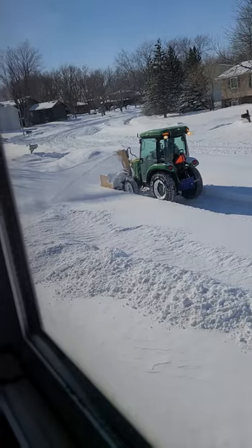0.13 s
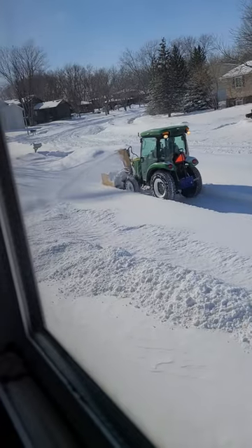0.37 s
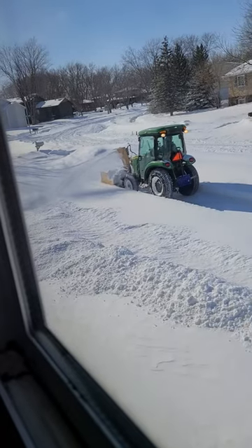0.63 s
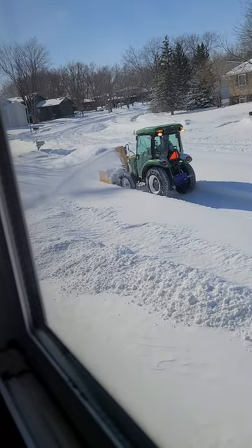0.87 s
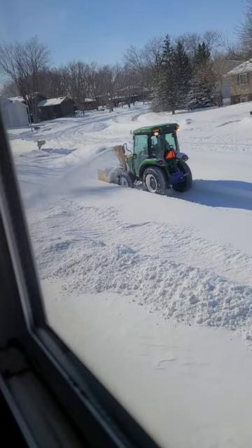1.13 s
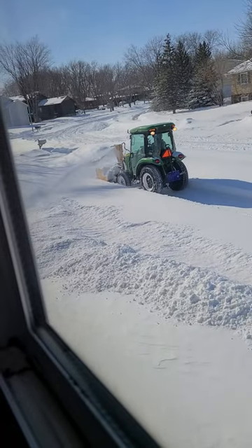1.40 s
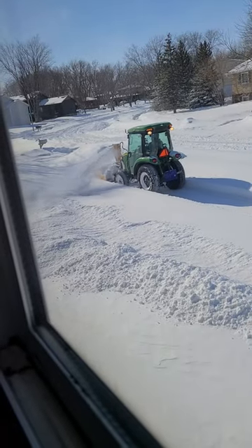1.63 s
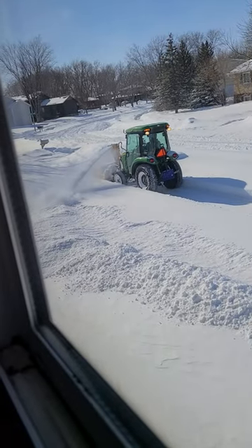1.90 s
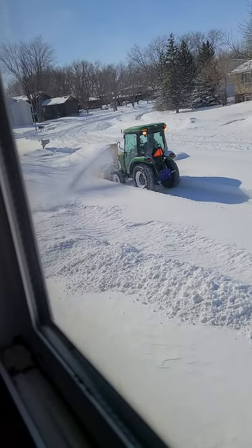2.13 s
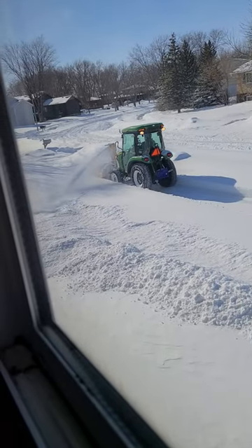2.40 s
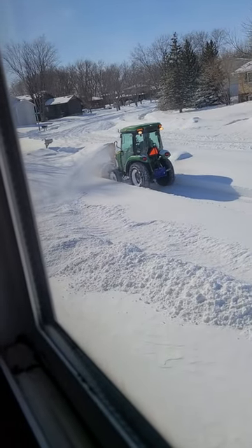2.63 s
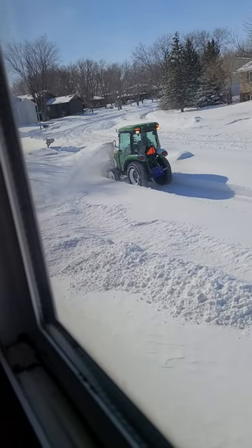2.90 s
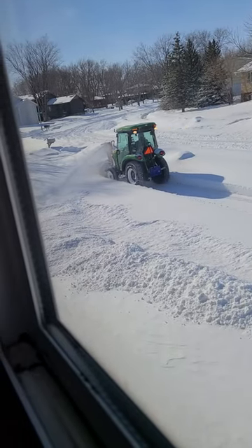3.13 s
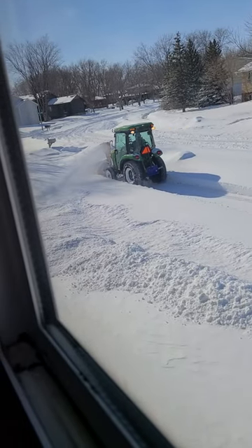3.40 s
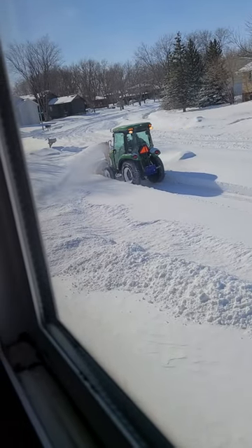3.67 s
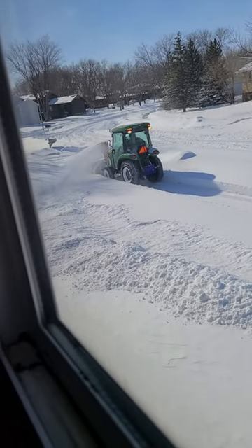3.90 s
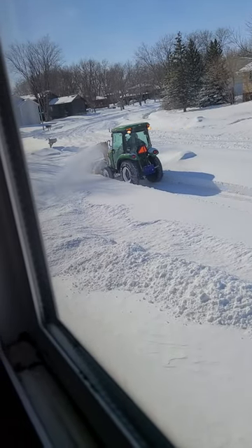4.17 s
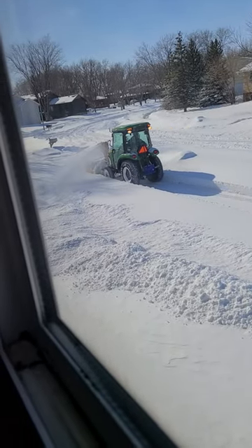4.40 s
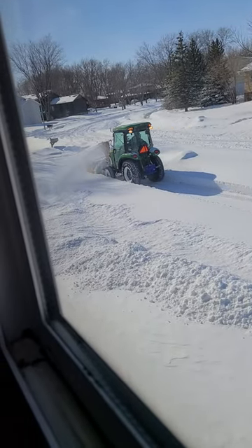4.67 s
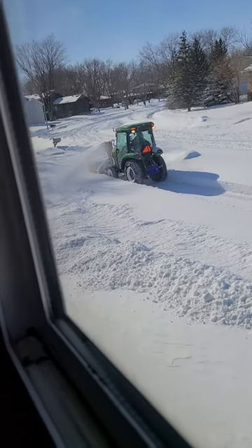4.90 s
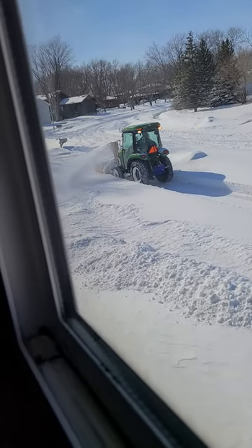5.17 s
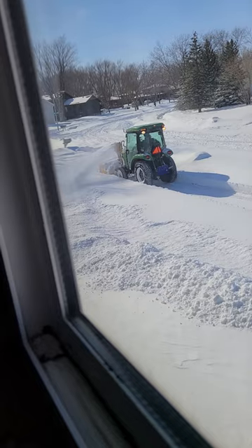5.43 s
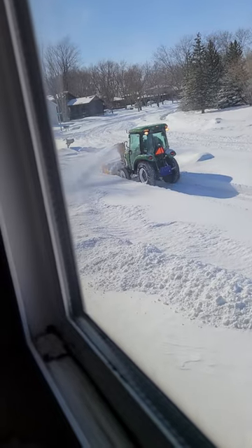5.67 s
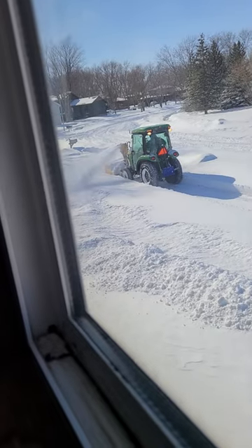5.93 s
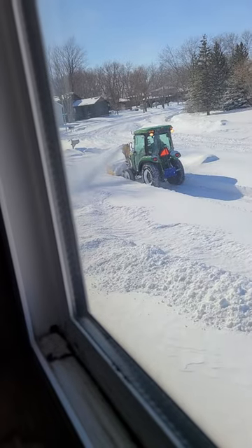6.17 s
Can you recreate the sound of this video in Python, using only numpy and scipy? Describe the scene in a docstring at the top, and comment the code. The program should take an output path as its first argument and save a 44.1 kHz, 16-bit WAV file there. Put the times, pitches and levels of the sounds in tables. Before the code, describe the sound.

Heard from indoors through glass, a tractor's deep steady engine hum and blower rattle rise in pitch as the load drops away.

```python
"""In a room with the window closed, a small diesel tractor is heard blowing snow in a yard and driving off.
The exhaust beat is a stack of waves locked to the firing; it booms and speeds up as the load drops.
The three-blade blower hums as waves locked to its shaft, and rattles with a pattern repeated every turn.
Shaped noise makes the rumble, clatter and roar, ringing at fixed pitches of pane and room.
Thin whines, a few late swells of hum, two faint close ticks and a quiet hiss complete the scene."""
import sys
import numpy as np
from scipy import signal
from scipy.fft import rfft, irfft
from scipy.io import wavfile

SR = 44100
rng = np.random.default_rng(int(sys.argv[2]) if len(sys.argv) > 2 else 0)


def int16_out(signal):
    """Quantize to a 16-bit WAV file."""
    q = np.round(np.clip(np.atleast_2d(signal).T, -1, 1) * 32767)
    wavfile.write(sys.argv[1], SR, q.astype(np.int16))


def ratio(d):
    """dB to gain"""
    e = np.asarray(d, float) / 20
    return 10 ** e


N = 277830
T = np.arange(N) / SR  # time of every sample, seconds
HZ = np.fft.rfftfreq(N, 1 / SR)

# How noise differs between left and right.
# Each row: frequency in Hz, left minus right in dB.
SIDE_BALANCE = [(60, 0), (170, -3.5), (290, 5), (450, -3.5), (850, 1), (2440, -1), (4150, 4), (6500, 9.5),
                (8500, 8.5), (10000, 0)]
# Each row: frequency in Hz, likeness of the two sides from 0 to 1.
SIDE_LIKENESS = [(40, 0.99), (100, .95), (180, .95), (300, 0.7), (480, .7), (600, 0), (1000, 0.1),
                 (2500, 0.18), (4000, 0.4), (6000, 0.01), (12000, 0.2)]
# Each row: frequency in Hz, radians by which left leads.
LEFT_LEAD = [(0, 0.24), (950, 1), (1460, 4.5), (1810, 0.77), (2330, 9), (2840, 7.95), (3790, 14),
             (4480, 14.65), (5340, 15), (5940, 19), (6460, 11), (7240, 18.5)]

# How the tractor moves.
# Engine speed. Each row: time in seconds, firing rate in Hz.
FIRING_RATE = [(0.0, 42.76), (0.39, 42.75), (0.72, 42.48), (1.18, 42.72), (1.38, 42.58), (1.58, 42.29),
               (1.97, 42.73), (2.36, 42.72), (2.95, 43.07), (3.15, 42.94), (3.54, 43.92), (3.74, 45.12),
               (4.33, 48.41), (4.53, 48.05), (4.72, 48.6), (4.92, 48.4), (5.51, 48.95), (6.3, 48.92)]
# The tractor swings round. Each row: time in seconds, share of the turn from 0 to 1.
SWING_ROUND = [(0, 0.01), (.7, 0.17), (1.36, 0.36), (1.5, 0.6), (2.4, 0.79), (3.5, 1.0)]
UNLOAD_S, UNLOAD_LENGTH_S = 3.92, .09  # the blower leaves the drift, then the tractor draws away

# How the level of each part follows the drive.
# Each row: dB at first, dB change over the swing, dB change on unloading, dB per second after.
ORDER_LEVELS = [(-41.5, -2, 1, -11.5), (-38.5, -2.7, 0.35, -5), (-43, -14.5, 0, -5.5), (-61.5, 5, -9, -3.5),
                (-54.5, -8.0, -3.5, -2.5), (-52.0, -6, -6.5, -0.8), (-60.5, -3, -9, 2)]  # one row for each exhaust order, 1 to 7
HUM_LEVEL = (-51.0, -2, -4, -0.4)
WHINE_LEVEL = (-57.5, -1, -9.5, -4.5)
RUMBLE_LEVEL = (-61.5, -0.5, 1.4, -4)
CLATTER_LEVEL = (-68, -3.0, -2.5, -0.63)
ROAR_LEVEL = (-60.5, -1, 2.5, -0.42)

# Higher exhaust orders. Each row: order, dB against order 7.
HIGH_ORDERS = [(8, -10), (9, -5), (10, -13), (11, -13)]
# Unequal cylinders fill in quarter orders. Each row: order, dB against order 2.
UNEVEN_ORDERS = [(.75, -34), (1.25, -29), (1.75, -21), (2.25, -29), (4.75, -36), (5.75, -34), (8.75, -39)]
# Room booms. Each row: frequency in Hz, width in Hz, lift in dB.
ROOM_BOOMS = [(46.15, 3.4, 5.5), (86.1, 7.2, 5.5), (182.2, 11, 9.5), (231, 9.0, 4), (267.2, 10, 6)]
SURGE_FIRINGS = 15.76  # the exhaust sags once in so many firings, as the auger bites
# Sag as a share: depth for a full swing, depth added once unloaded; then its place in the cycle in turns.
SURGE_DEPTH, SURGE_DEEPENS, SURGE_TURNS = 0.13, 0.094, 0.06
SHADE_S, SHADE_DB = 5.58, -5  # the exhaust drops suddenly as the pipe turns away

IMPELLER_TURNS = .4609  # blower shaft turns per firing
PUMP_CYCLES = 6.273  # cycles per firing of a geared whine
RATTLE_SHARE = .16  # rms of the repeating rattle against the noise
# Blower tones. Each row: multiple of the shaft rate, dB against the blade hum.
BLADE_TONES = [(3, 0), (7, -14), (9, -18)]

# Noise colours. Each row: frequency in Hz, relative level in dB per Hz.
RUMBLE_SHAPE = [(20, -25.5), (32, -8), (45, 1), (65, 1.5), (100, -0.5), (150, -6), (220, -9.5), (300, -12),
                (450, -28.5), (600, -48.5), (1200, -96.5)]
CLATTER_SHAPE = [(400, -38), (700, -16), (1300, 1.5), (1600, -10.5), (1900, -2.5), (2250, -4), (2800, -3.5),
                 (4700, -14.5), (7000, -22), (8200, -41), (9200, -78.5)]
ROAR_SHAPE = [(25, -30.5), (60, -8), (150, -16), (270, -7.5), (450, -17), (560, -29.5), (850, -31.5),
              (1100, -30.5), (1600, -32), (2800, -35.5), (4500, -37), (6500, -47), (8000, -61.5),
              (9000, -84)]
HISS_SHAPE = [(6000, -20), (8300, -3), (9300, -8), (9900, -4), (10700, -5), (11800, 0), (13300, 1),
              (15600, -1)]
# Whines of the tractor let through by the pane.
# Each row: frequency in Hz, width in Hz, dB over the clatter, left minus right in dB.
PANE_WHINES = [(1260, 30, 5, 0), (1780, 60, 5, -3), (1840, 40, 4, -3), (1895, 30, 5, -3), (1950, 40, 5, -2),
               (2126, 20, 11, 1), (2358, 30, 5, 0)]
# Pitches at which pane and room ring.
# Each row: frequency in Hz, width in Hz, dB over the roar, left minus right in dB.
PANE_RINGS = [(300.4, 2.6, 5.5, 3.5), (353, 10, 10, -0.5), (385.3, 10, 10.5, -10.5),
              (451.8, 31.8, 6.5, -1.5), (528, 6.2, 0.5, -3.5), (626.6, 69, 7.5, -4.5), (702.5, 32, 17, 5),
              (749, 11, 13.5, 5.5), (1002, 37, 12.5, 1), (1178, 120, 4.5, 0), (2763, 220, 6.5, 6),
              (3096, 140, 7.5, 5.5), (3290, 110, 7, -3)]

# A thin high whistle that fades as the tractor turns away. Each row: time in seconds, level in dB.
WHISTLE_LEVEL = [(0, -78.5), (.6, -78), (1, -83.5), (2.2, -85), (4, -91.5), (6.3, -99)]
# A transmission whine glides with ground speed. Each row: time in seconds, pitch in Hz, level in dB.
GLIDE_PATH = [(0, 1840, -82), (.7, 1815, -83), (1.3, 1825, -86), (1.6, 1862, -81), (2.3, 1890, -81),
              (3.2, 1905, -81), (3.7, 1900, -84), (4.1, 1850, -88), (5.0, 1870, -86), (6.3, 1880, -95)]
HISS_DB = -86.5
# Close ticks. Each row: start in seconds, starting level in dB, seconds to fall 60 dB, left minus right in dB.
TICK_EVENTS = [(0.2374, -65.5, 0.045, 8), (1.332, -65.5, 0.096, 6)]
# Band of each tick. Each row: lowest Hz, highest Hz.
TICK_BANDS = [(6300, 8300), (4800, 6800)]
# Swells of a hum that emerges as the exhaust fades. Each row: start in seconds, length in seconds, level in dB.
HUM_SWELLS = [(4.401, 0.37, -56.5), (5.048, 0.33, -58), (5.45, .5, -55.5), (6.024, 0.32, -54)]


def read(points, hz):
    """Reads a table on a log-frequency axis."""
    f, value = np.transpose(points)
    return np.interp(np.log(hz + 1), np.log(f + 1), value)


def curve(rows, index):
    """Reads one column of a time table at every sample."""
    columns = np.transpose(rows)
    return np.interp(T, columns[0], columns[index])


def drift(rate_hz):
    """Random wandering of rms about 1: slow waves, from 0.3 Hz up to rate_hz, that start at random points."""
    hz = np.geomspace(.3, rate_hz, num=20)
    waves = np.sin(2 * np.pi * (np.outer(T[::200], hz) + rng.random(len(hz))))
    coarse = waves @ hz ** -.5  # slower waves are stronger
    return np.interp(T, T[::200], coarse / coarse.std())


def sided(db):
    """Gains for left and right from a left-right difference in dB."""
    return ratio(np.multiply.outer([.5, -.5], db))


def noise(shape, peaks=(), pattern=0., band=(0, 22050)):
    """Two-sided noise of rms 1 within band: a smooth spectrum with resonant bumps, partly alike on both sides."""
    a, b, c, d = rng.standard_normal((len(HZ), 4)).T
    same = np.clip(read(SIDE_LIKENESS, HZ), 0, 1)
    steady = rfft(pattern * np.ones(N)) / np.sqrt(N / 2)  # a repeating part is shared by both sides
    left = a + 1j * b
    right = same * left + np.sqrt(1 - same ** 2) * (c + 1j * d) + steady
    right = right * np.exp(-1j * np.interp(HZ, *np.transpose(LEFT_LEAD)))
    power = np.ones((2, len(HZ)))
    for hz, width, db, side_db in peaks:
        bump = 1 / (1 + (2 * (HZ - hz) / width) ** 2) ** 2
        power += (ratio(db) * sided(side_db))[:, None] ** 2 * bump
    z = np.array([left + steady, right]) * np.sqrt(power)
    z = z * ratio(read(shape, HZ)) * sided(read(SIDE_BALANCE, HZ))
    in_band = (HZ > band[0]) * (HZ < band[1])
    return irfft(z, N) / irfft(z * in_band, N).std()


def unloaded():
    """Share 0-1 of the load that has dropped."""
    return np.clip((T - UNLOAD_S) / UNLOAD_LENGTH_S, 0, 1)


def heard(first_db, swing_db, unload_db, away_db):
    """Level in dB of one part as the tractor swings round, unloads and draws away."""
    turned_db = first_db + swing_db * curve(SWING_ROUND, index=1)
    return turned_db + unload_db * unloaded() + away_db * np.maximum(T - UNLOAD_S, 0)


def room_lift(hz):
    """Lift in dB where a tone comes near one of the room booms."""
    return sum(db / (1 + (2 * (hz - f) / width) ** 2) for f, width, db in ROOM_BOOMS)


def exhaust(turn):
    """Orders locked to the firing; pipe and pane delay each differently, and the room lifts orders 1-7."""
    firing = curve(FIRING_RATE, index=1)
    depth = SURGE_DEPTH * curve(SWING_ROUND, index=1) ** .5 + SURGE_DEEPENS * unloaded()
    depth = np.clip(depth, 0, .9)
    sag_db = 20 * np.log10(1 - depth * np.cos(turn / SURGE_FIRINGS - 2 * np.pi * SURGE_TURNS))
    sag_db = sag_db + SHADE_DB * np.clip((T - SHADE_S) / 0.052, 0, 1)
    orders = [(k, heard(*row) + room_lift(k * firing) + sag_db) for k, row in enumerate(ORDER_LEVELS, start=1)]
    second_db, seventh_db = orders[1][1], orders[6][1]
    # these follow order 7 or order 2, lift included
    orders += [(k, seventh_db + db) for k, db in HIGH_ORDERS]
    orders += [(k, second_db + db) for k, db in UNEVEN_ORDERS]
    beat = np.zeros(N)
    for k, db in orders:
        lag = 1.2 * (k - 2) ** 2  # radians
        wobble_db = (0.26 + .14 * k) * drift(15)  # higher orders waver more
        beat += ratio(db + wobble_db) * np.cos(k * turn + lag)
    return beat


def blower_hum(shaft):
    """Blade tones at multiples of the shaft rate, each wavering in level."""
    return sum(ratio(heard(*HUM_LEVEL) + db + drift(13)) * np.cos(k * shaft) for k, db in BLADE_TONES)


def geared_whine(turn):
    """One wavering tone geared to the engine."""
    return ratio(heard(*WHINE_LEVEL) + drift(52)) * np.cos(PUMP_CYCLES * turn)


def rumble():
    """Low noise that follows the drive."""
    return ratio(heard(*RUMBLE_LEVEL)) * noise(RUMBLE_SHAPE, band=(105, 120))


def knocks(shaft, blade_db, fall_db):
    """The rattle of one blower turn, repeated every turn; every third harmonic is stronger."""
    k = np.arange(20, 130)
    lines = np.zeros(2049, complex)
    lines_db = blade_db * (k % 3 == 0) - fall_db * np.log2(k / 20)
    lines[k] = ratio(lines_db) * np.exp(2j * np.pi * rng.random(len(k)))
    place = np.arange(4096) / 4096  # share of one turn
    one_turn = irfft(lines) * (1 + .35 * np.cos(3 * 2 * np.pi * place))  # swells as each blade passes
    return np.interp(shaft / (2 * np.pi), place, one_turn / one_turn.std(), period=1)


def clatter(shaft, rattle):
    """Bright noise with whines and rattle, throbbing at one, three and five times the shaft rate."""
    throb_db = .8 * np.cos(shaft) + .6 * np.cos(3 * shaft) + .4 * np.cos(5 * shaft)
    level_db = heard(*CLATTER_LEVEL) + throb_db + 0.26 * drift(14.0)
    return ratio(level_db) * noise(CLATTER_SHAPE, PANE_WHINES, rattle, band=(1700, 2200))


def roar(rattle):
    """Broad noise that rings at fixed pitches of pane and room and carries some rattle."""
    level_db = heard(*ROAR_LEVEL) + 0.54 * drift(5.5)
    return ratio(level_db) * noise(ROAR_SHAPE, PANE_RINGS, rattle, band=(400, 1100))


def whistle():
    """A narrow peak of noise, 150 Hz wide around 4665 Hz, standing 60 dB over a nearly flat base."""
    return ratio(curve(WHISTLE_LEVEL, index=1)) * noise([(20, 0.0072), (20000, 0)], [(4665, 150, 60, 2.6)])


def tractor():
    """Exhaust and blower share one firing clock; noise parts join the tones on both sides."""
    turn = 2 * np.pi * np.cumsum(curve(FIRING_RATE, index=1)) / SR
    shaft = IMPELLER_TURNS * turn
    tones = np.sqrt(2) * (exhaust(turn) + blower_hum(shaft) + geared_whine(turn))
    late = np.interp(T - .00015, T, tones)  # the right side is a little further from the pane
    rattle = RATTLE_SHARE * knocks(shaft, blade_db=4, fall_db=3)
    both_tones = sided(-0.99)[:, None] * np.array([tones, late])
    return both_tones + rumble() + clatter(shaft, rattle) + roar(rattle) + whistle()


def transmission():
    """Two thin wavering lines that glide together, the second 57 Hz lower and 1.4 dB weaker."""
    hz = curve(GLIDE_PATH, index=1) + 3.0 * drift(11)
    upper, lower = [ratio(2.3 * drift(9.4)) * np.cos(2 * np.pi * np.cumsum(f) / SR) for f in (hz, hz - 57)]
    lines = upper + ratio(-1.4) * lower
    return np.sqrt(2) * ratio(curve(GLIDE_PATH, index=2)) * lines * sided(-2.5)[:, None]


def microphone_hiss():
    """Nearly steady high noise that swells briefly by 2.5 dB around 4.85 s."""
    swell_db = 2.5 * np.exp(-((T - 4.85) / .18) ** 2)
    return ratio(HISS_DB + swell_db) * noise(HISS_SHAPE)


def ticks():
    """Short bright puffs of noise that die away at once."""
    out, t = np.zeros((2, N)), T[:3000]
    for (s, db, t60, side_db), band in zip(TICK_EVENTS, TICK_BANDS):
        bandpass = signal.butter(4, band, "bandpass", fs=SR, output="sos")
        puff = signal.sosfilt(bandpass, rng.standard_normal((2, len(t))))
        fade = ratio(db - 60 * t / t60) * np.minimum(t / .001, 1)
        out[:, round(s * SR):][:, :len(t)] += sided(side_db)[:, None] * puff / puff.std() * fade
    return out


def late_hum():
    """A wavering tone near 305 Hz in soft swells, out of step on the two sides."""
    turn = 2 * np.pi * np.cumsum(305 + 1.8 * drift(8.4)) / SR
    swells = np.zeros(N)
    for s, length, db in HUM_SWELLS:
        swells += ratio(db) * np.clip(np.minimum(T - s, s + length - T) / .06, 0, 1)  # 0.06 s edges
    return np.sqrt(2) * swells * np.cos(turn + np.array([[.4], [-.4]]))


def scene():
    """All sources on the two sides, with a soft start."""
    sources = tractor() + transmission() + ticks() + late_hum()
    return sources * np.minimum(.4 + T / .003, 1)


def top_cut(x):
    """Nothing passes above the cut-off."""
    return signal.sosfilt(signal.butter(12, 15720, fs=SR, output="sos"), x)


def record(dry):
    """Adds the microphone hiss and finishes the mix."""
    mix = dry + microphone_hiss()
    return top_cut(mix)


dry = scene()
out = record(dry)
int16_out(out)
```